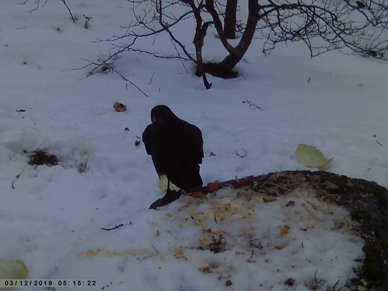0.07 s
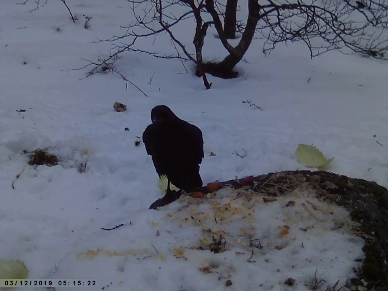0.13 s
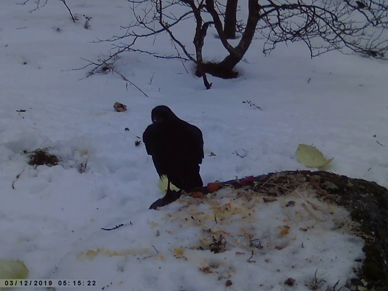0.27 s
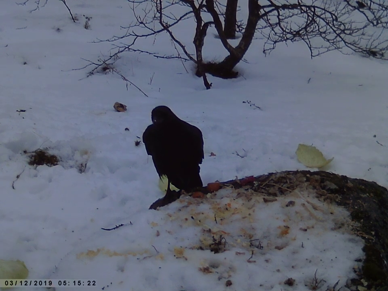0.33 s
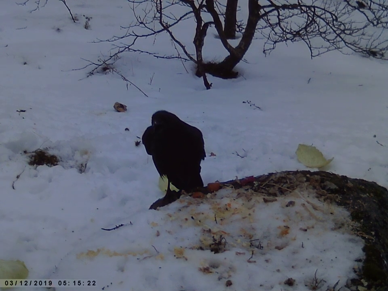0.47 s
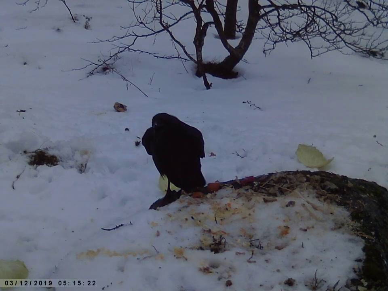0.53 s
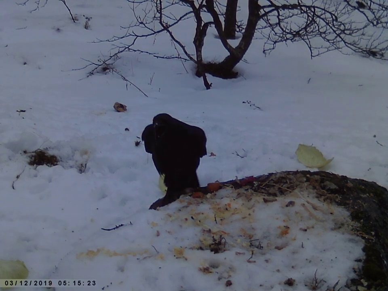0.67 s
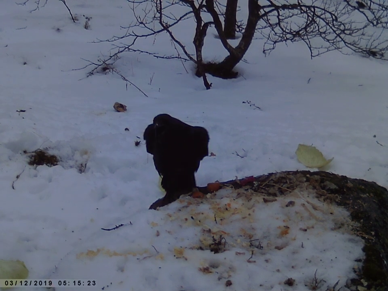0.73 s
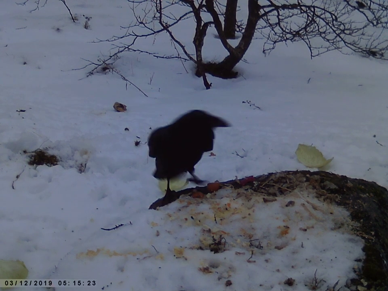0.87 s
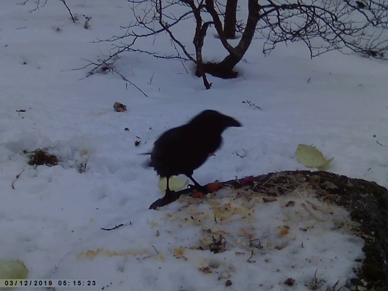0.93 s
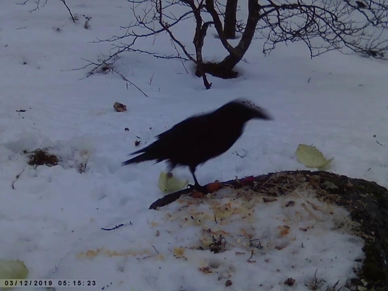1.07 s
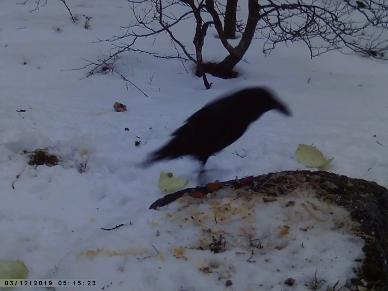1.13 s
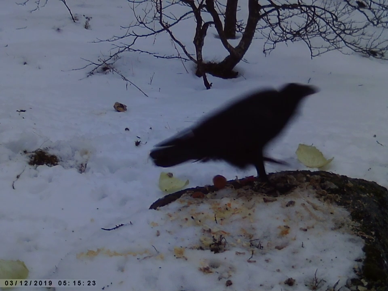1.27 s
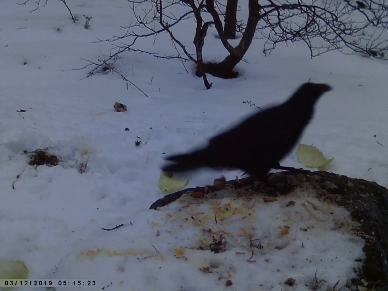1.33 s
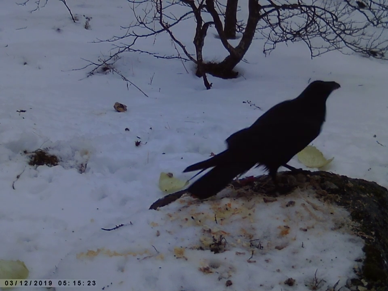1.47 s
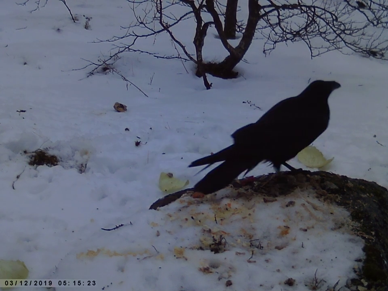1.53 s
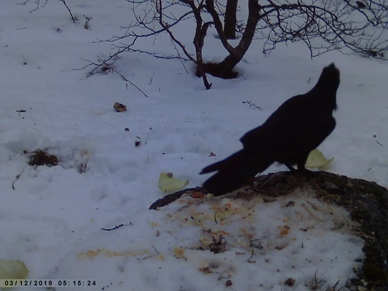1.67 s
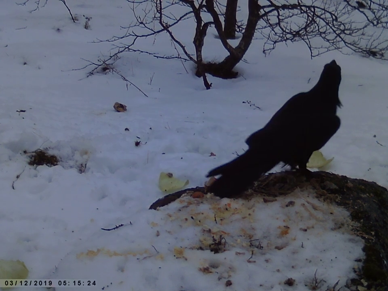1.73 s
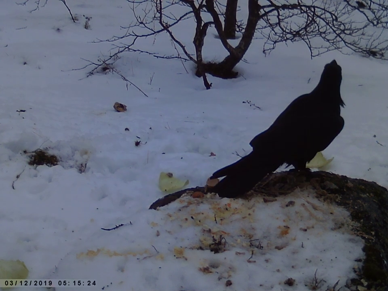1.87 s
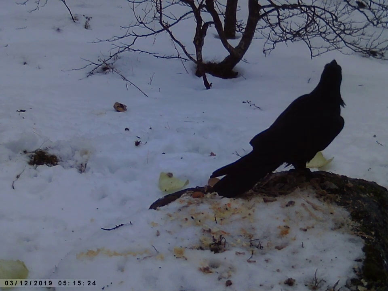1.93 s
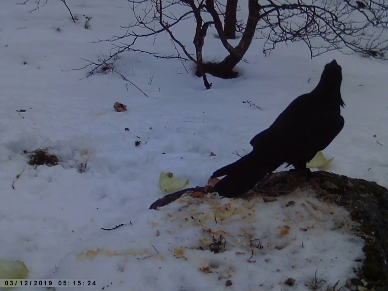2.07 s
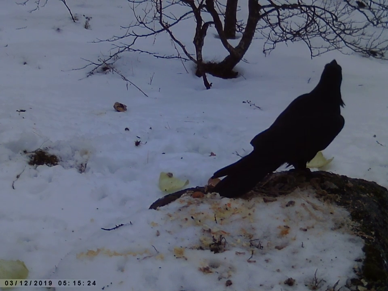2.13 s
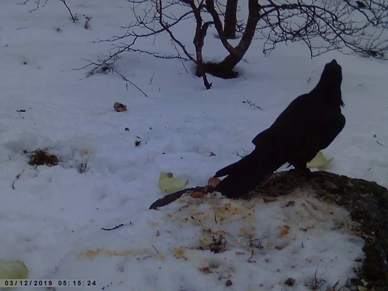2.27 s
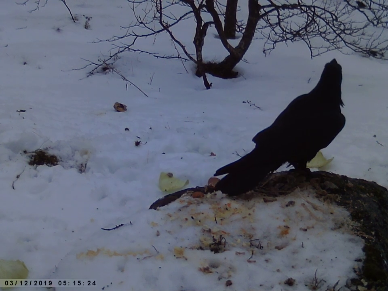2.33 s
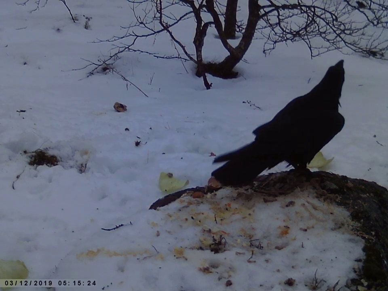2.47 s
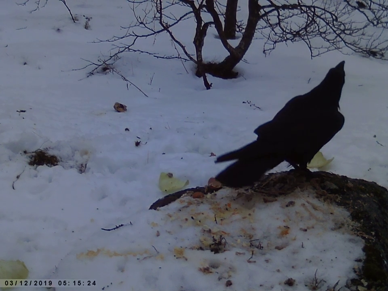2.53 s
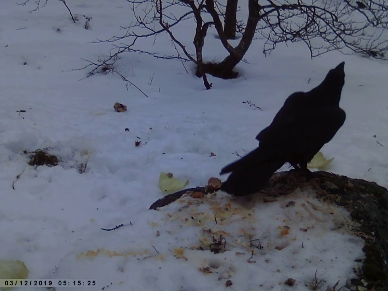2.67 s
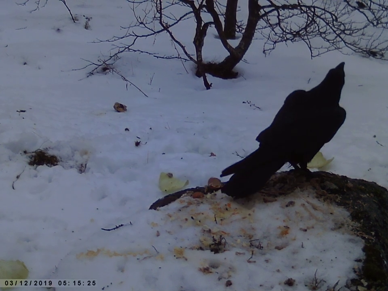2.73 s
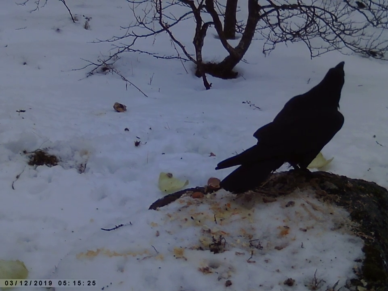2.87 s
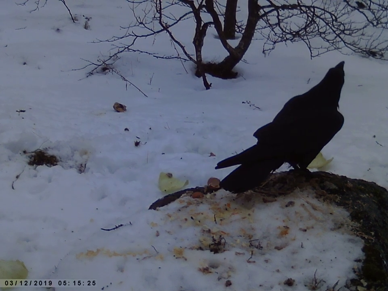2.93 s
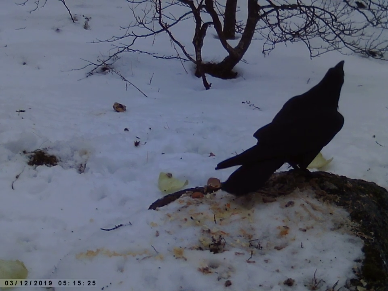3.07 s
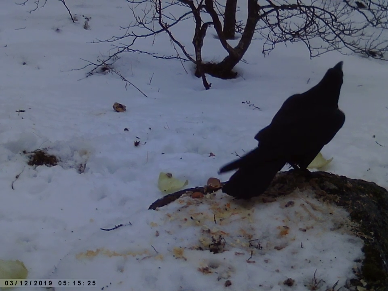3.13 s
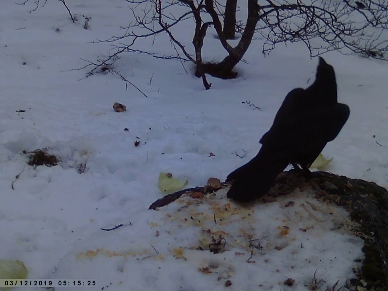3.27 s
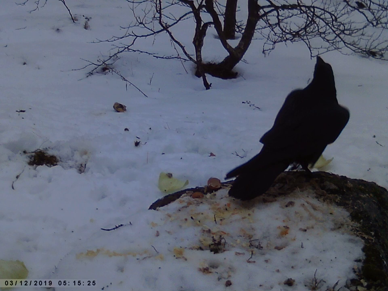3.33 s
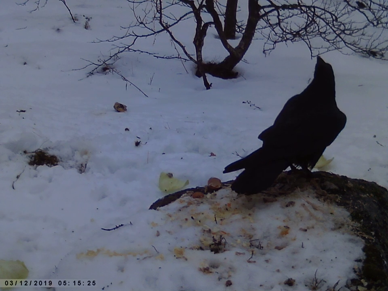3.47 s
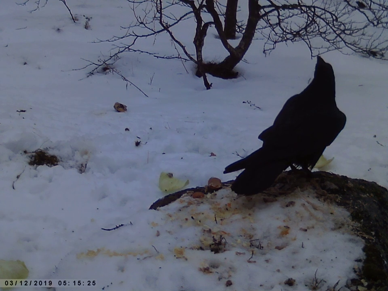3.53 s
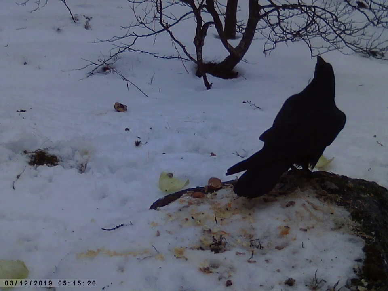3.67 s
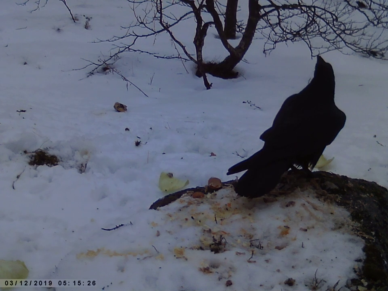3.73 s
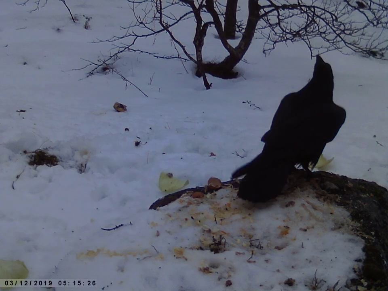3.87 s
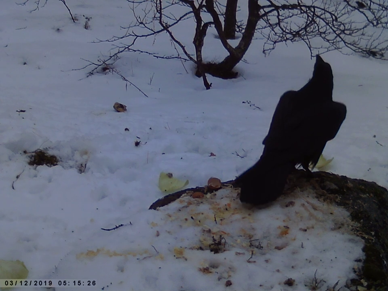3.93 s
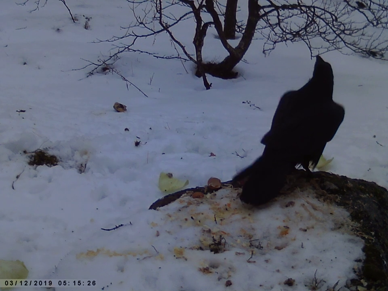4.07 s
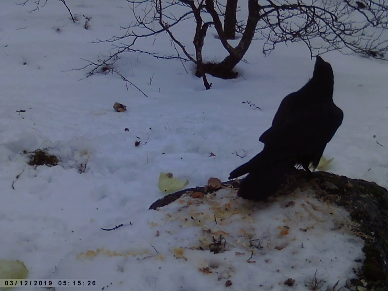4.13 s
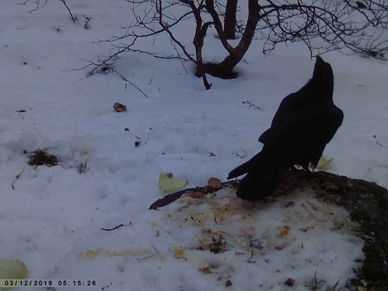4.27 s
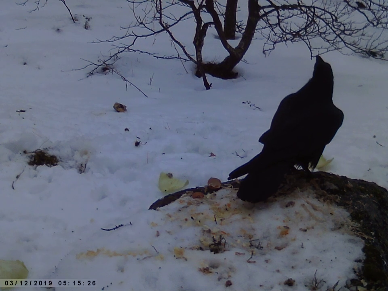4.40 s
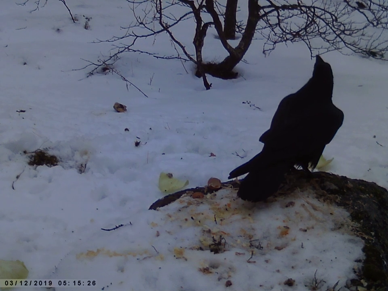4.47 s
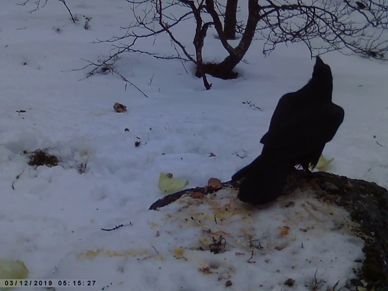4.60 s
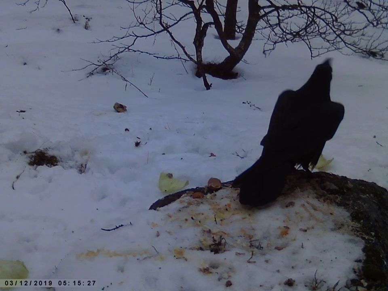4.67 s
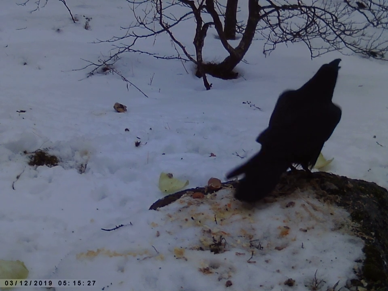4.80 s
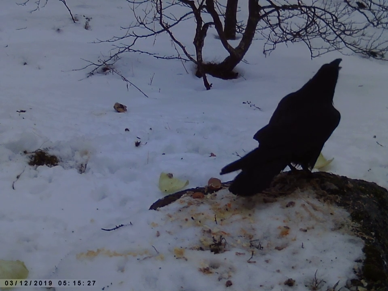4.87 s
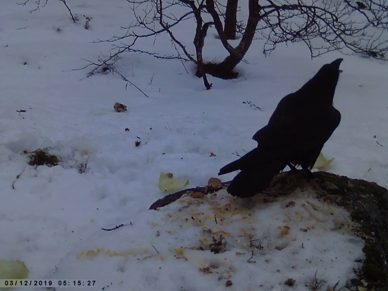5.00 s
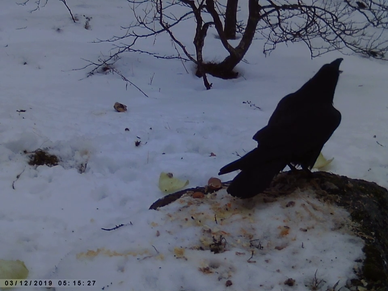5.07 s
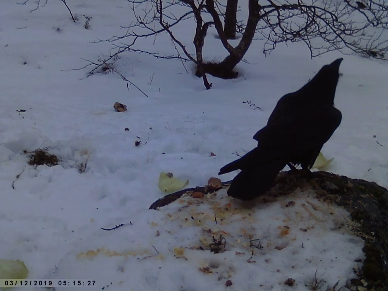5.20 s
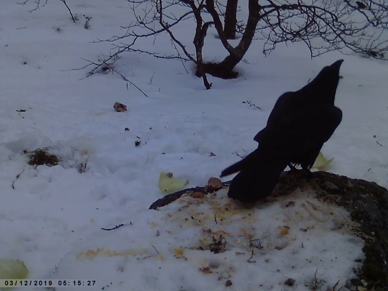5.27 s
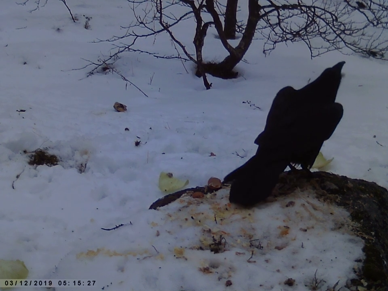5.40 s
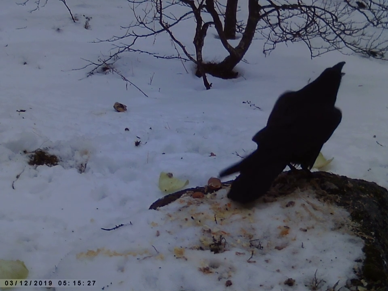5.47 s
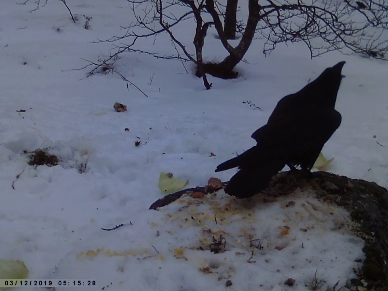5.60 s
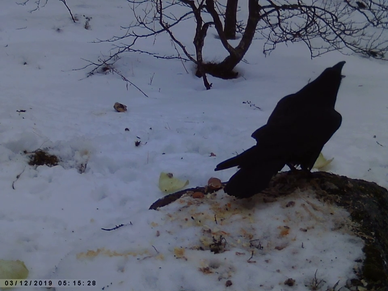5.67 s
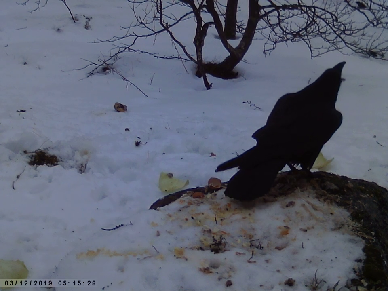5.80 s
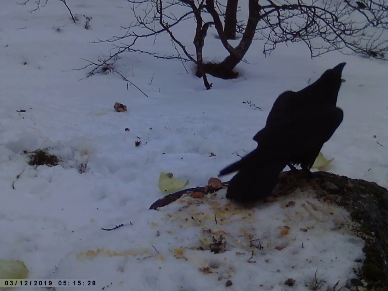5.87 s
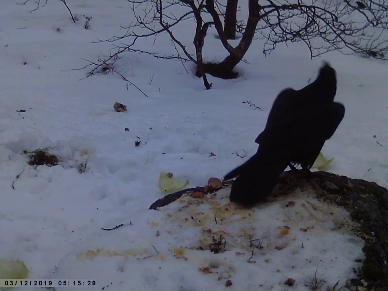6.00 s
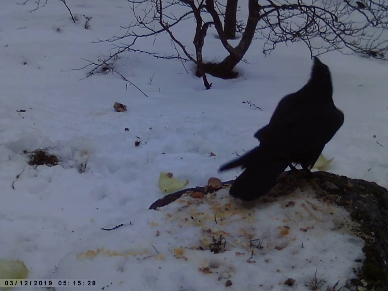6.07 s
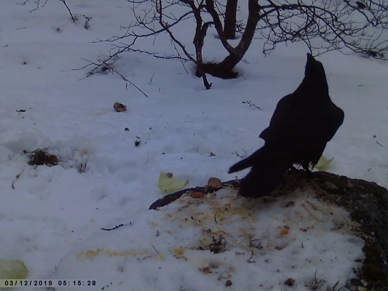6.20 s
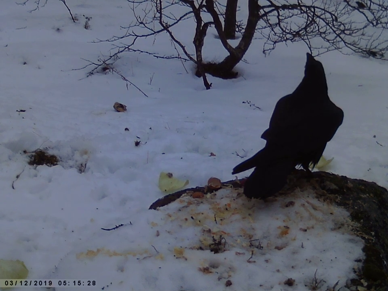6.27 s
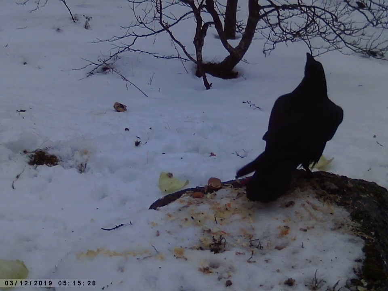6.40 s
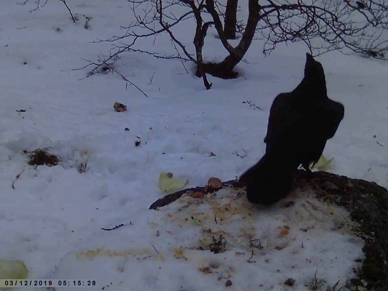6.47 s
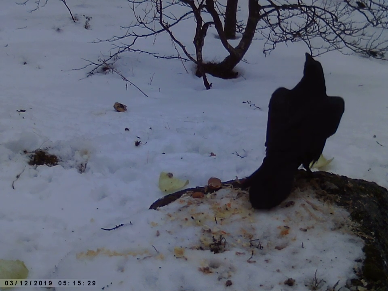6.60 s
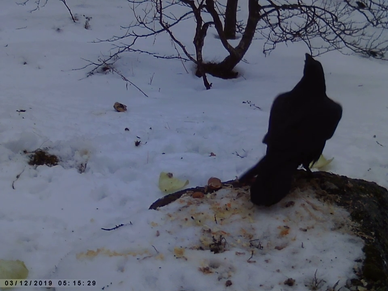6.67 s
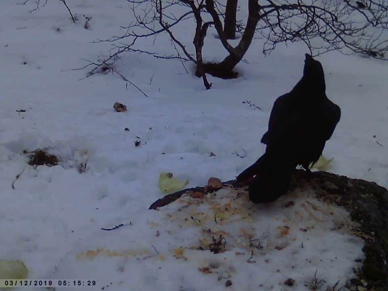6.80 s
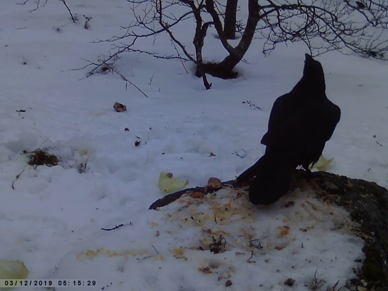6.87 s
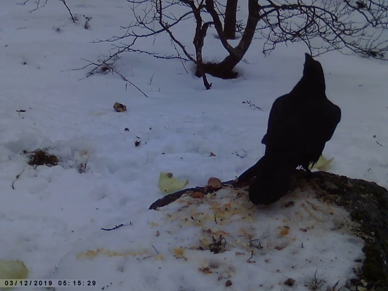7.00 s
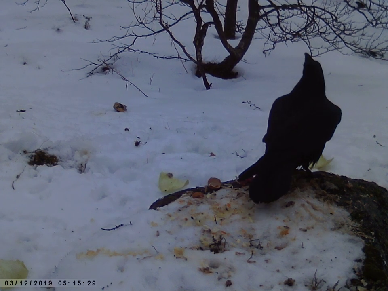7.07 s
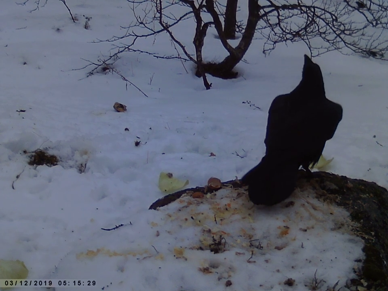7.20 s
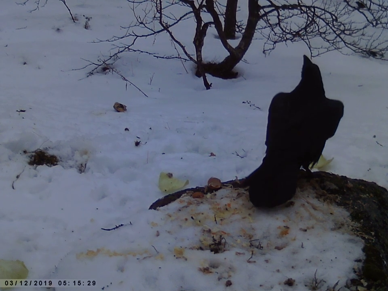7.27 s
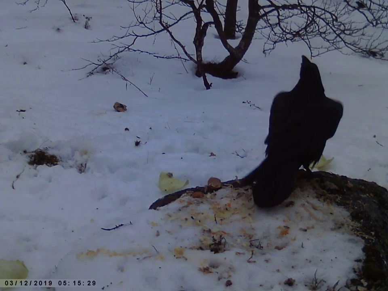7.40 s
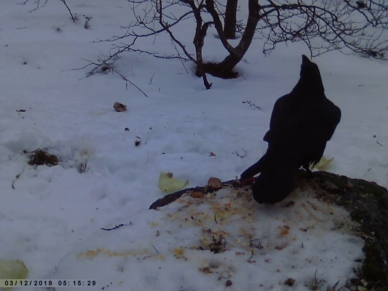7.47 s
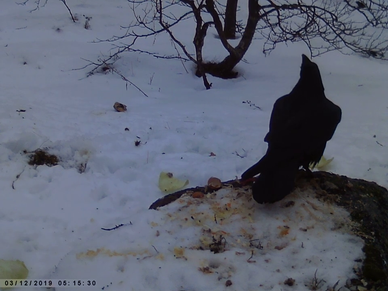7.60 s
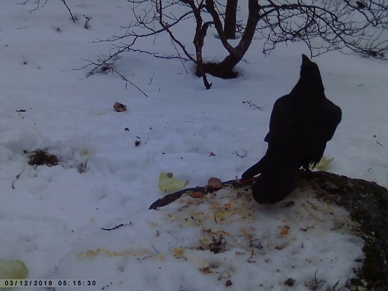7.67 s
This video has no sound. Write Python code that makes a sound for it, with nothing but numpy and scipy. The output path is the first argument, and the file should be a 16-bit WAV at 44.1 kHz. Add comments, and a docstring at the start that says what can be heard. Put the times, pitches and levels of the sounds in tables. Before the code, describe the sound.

Wind buffets a close outdoor microphone with low rumbling and blunt pops. A large black bird croaks once, harsh and forward, then scratches and crunches over crusted snow. The wind eases, and the bird turned away repeats a nasal, fluttering croak eight times, about every half to three quarters of a second. Each is a quarter second long, stuttering at first and dropping at the end, with a slight woodland reverberation. Gusts return later; thin hiss stays constant.

```python
"""Raven croaking in a windy winter forest

A raven on a snowy rock croaks once towards the microphone, hops up the rock, then croaks eight times facing away.
Each croak is a pulse train through throat resonances: it stutters, flutters in pitch about 43 times a second, then sags.
Noise bursts make the claws on crusted snow, and a swell of noise the folding wings; the forest answers faintly.
Gusts of shaped noise and cusps of pressure buffet the microphone, above a faint steady hiss."""
import sys
import numpy as np
from scipy import signal
from scipy.fft import rfft, irfft, next_fast_len
from scipy.io import wavfile
from scipy.ndimage import uniform_filter1d, map_coordinates

SR = 44100
rng = np.random.default_rng(int(sys.argv[2]) if len(sys.argv) > 2 else 0)


def inscribe(sig):
    """Save sig as 16-bit PCM at rate SR to the path in sys.argv[1].

    A 1-D sig is mono; a 2-D sig holds one channel per row.
    Samples are clipped to [-1, 1] before scaling.
    """
    pcm = np.round(np.clip(np.atleast_2d(sig).T, -1, 1) * 32767)
    wavfile.write(sys.argv[1], SR, pcm.astype(np.int16))


N = 340893

# Croaks: onset_s, length_factor, pitch_factor, relative_level_db, facing_microphone_0_to_1, throat_size_factor
# (the last multiplies frequency when the throat curves are read)
CROAKS = [(.622, 0.93, 1.043, -16, 0.91, 1.007), (2.610, 0.95, 1.024, -16.5, 0.06, 1.0),
          (3.160, 0.98, 1.024, -16.5, 0.03, 1.0), (3.885, 0.96, 1.032, -17, 0, 1.021),
          (4.606, 0.99, 1.034, -16.5, 0, 1.014), (5.258, 1.023, 1.002, -17, 0, 1.009),
          (5.837, 1.002, .985, -17.5, 0, 0.995), (6.444, 1.022, 1.02, -16.5, 0, 1.033),
          (7.197, 1.042, 1.007, -17.5, 0, 1.034)]
# Throat resonances with the beak open: frequency_hz, gain_db
THROAT_OPEN = [(230, -30), (570, -17), (760, -20.5), (990, -13.5), (1165, 2.5), (1290, -6), (1470, -4),
               (1780, -12.5), (2080, -24), (2500, -15.5), (2920, -17.5), (3200, -25), (3850, -18),
               (5100, -24.5), (6800, -46.5)]
# Throat resonances with the beak nearly shut: frequency_hz, gain_db
THROAT_SHUT = [(230, -16.5), (520, -18), (730, -20.5), (1040, -2), (1450, -6), (2000, -24.5), (2650, -5),
               (3150, -20.5), (3700, -14), (5100, -23), (6800, -44)]
# Fading of the voice towards the top: frequency_hz, gain_db
ROLL_OFF = [(6800, 0), (8300, -6.5), (10500, -15), (15000, -29)]
# Extra strength straight in front of the beak: frequency_hz, gain_db
FRONT = [(300, 3.5), (720, 12), (1150, -1.5), (1450, -1.5), (1900, 12.5), (2650, 0), (3400, 11), (4450, 17),
         (5600, 26), (7000, 24), (10500, 31.5)]
# Claws and crusted snow during the hop: start_s, peak_db, pitch_hz
STEPS = [(1.021, -42.5, 4710), (1.1192, -35.5, 5400), (1.1393, -41.5, 5030), (1.1973, -34, 4870),
         (1.2041, -38, 2623), (1.2684, -37.5, 4760), (1.277, -26, 4720), (1.2924, -34.5, 4900),
         (1.3888, -44, 4770), (1.6482, -45, 4900), (1.7737, -39.5, 5040)]
# Spectrum of the brushing feathers: frequency_hz, level_db
FEATHERS = [(1500, -25), (5000, 4), (9000, -16.5)]
# Decay time of the far trees: frequency_hz, t60_s
FOREST_T60 = [(300, 0.93), (1150, 0.94), (1900, 0.7), (5000, 0.74), (9000, 0.75)]
# Scattering by the trees: frequency_hz, gain_db
FOREST = [(300, -3.5), (800, 1), (1150, 0), (2000, 5), (3200, 2.5), (5200, 17.5), (7000, 17), (11000, 13)]
# Course of the wind at the microphone, before puffs and eddies: time_s, strength_db
WIND = [(0, -35), (.25, -26), (.55, -24), (.88, -24.5), (1.4, -39), (2.18, -44), (2.37, -63), (2.68, -40.5),
        (3.45, -47), (3.78, -53), (3.95, -42.5), (4.5, -53.5), (4.75, -45), (5.12, -49), (5.3, -33.5),
        (5.52, -43.5), (5.8, -32), (7.05, -28), (7.73, -22)]
# Short puffs that stand out from the wind: centre_s, length_s, rise_db
PUFFS = [(1.967, 0.017, 11), (2.202, 0.026, 10.5), (2.982, 0.067, 9), (3.609, 0.029, 12.5),
         (4.208, 0.036, 8.5), (4.408, 0.022, 14.5), (4.978, 0.038, 11.5), (6.272, 0.029, 5.5),
         (6.753, 0.017, 7.5)]
# Spectrum of light air: frequency_hz, level_db
RUMBLE = [(12, -34), (20, -1), (43, -1.5), (75, -0.5), (187, -21.5), (269, -39.5), (352, -42.5), (500, -49),
          (650, -81), (1100, -120)]
# Spectrum of strong gusts: frequency_hz, level_db
GUST = [(12, -32), (20, -4.5), (59, 1.5), (86, 0), (145, -3.5), (258, -14.5), (392, -22.5), (631, -37),
        (700, -35.5), (910, -65.5), (1540, -120)]
# Strongest eddies that slap the microphone: start_s, relative_peak_db
SLAPS = [(.217, -25), (.297, -27.5), (.473, -25.5), (.499, -23), (.529, -20), (.588, -22.5), (.88, -23),
         (.924, -28), (6.177, -29), (7.081, -28.5), (7.682, -23)]
# Spectrum of the steady hiss: frequency_hz, level_db
HISS = [(120, -36), (200, 3), (538, -8.5), (579, -6.5), (623, -7), (683, -9), (916, -8.5), (4860, -18.5),
        (13300, -19.5), (16000, -18.5)]

# Croak settings hold for length and pitch factors of 1; times count from the onset.
# The voice starts as a stutter of short bursts that open wide, then choke off and sag in pitch
STUTTER_S, STUTTERS = .0134, 3
CHOKE_DB, STUTTER_SAG, STUTTER_ROUGH = 24, .16, .55
# Then it flutters, a little slower with each beat: first and settled period, beats it takes to settle
FIRST_FLUTTER_S, LAST_FLUTTER_S, SETTLE_BEATS = .021, .025, 2.2
# The stutter turns into flutter, and the flutter dies out: middle and length of each change
SETTLE_AT_S, SETTLE_S, STILL_AT_S, STILL_S = .031, .014, .206, .018
# A flutter swings below and above the pitch (shares of it) and swells at the crest
FLUTTER_DIP, FLUTTER_RISE, FLUTTER_SWELL_DB = .225, .06, 3
# The crest comes at this share of a flutter; a power under 1 leaves the low pitch quickly and lingers up there
CREST_SHARE, CLIMB_POWER = .79, .85
# The pitch holds, then sags as the air runs out, down to a floor; scoop and bend act on top of this
PITCH_HZ, HOLD_S, SAG_HZ_PER_S, SAG_FLOOR_HZ = 549.2, .205, 8400, 185
SCOOP, SCOOP_S = .11, .012  # the pitch is this share low at the onset and scoops up
# Effort: a soft lead-in, a quick attack, a slight swell, then the release
LEAD_S, LEAD_DB, LEAD_RISE_DB_PER_S = .0088, -8, 1800
ATTACK_DB, ATTACK_S, SWELL_DB_PER_S = -3.5, .028, 3.5
RELEASE_AT_S, RELEASE_S, RELEASE_DB = .22, .027, 21.5
# Roughness (0-1) clears as the croak goes on
ROUGH_START, ROUGH_END, CLEARING_S = .6, .22, .023
# The beak opens after the onset and closes again with the sag, to a last opening (0-1)
OPEN_AT_S, OPEN_S, CLOSE_AT_S, CLOSE_S, END_OPENING = .036, .04, .22, .019, .12

FOLD_AT_S, FOLD_S, FOLD_DB = 1.44, .09, -69.5  # the wings fold after the hop
EDDIES_PER_S, EDDY_DB = 14, 2  # the wind swings at random around its course
# Weaker slaps come at random and grow faster than the wind
SMALL_SLAPS_PER_S, SMALL_SLAP_DB, SLAP_GROWTH = 24, -7.5, 1.8
HISS_DB = -62.5
TOP_HZ = 15900  # band limit


def raven(voice_db=35, turned_db=-3):
    """Source-filter principle: membrane pulses excite the throat, and the beak directs the sound."""
    direct, spread = np.zeros(N), np.zeros(N)
    for s, length, pitch, db, facing, throat in CROAKS:
        t = np.arange(-2 * STUTTER_S * SR, SR // 3) / SR
        flow = amp(db + voice_db) * flicker(syrinx(t / length, pitch))
        wide, shut = (
            ring(flow, lambda hz: along(shape, hz * throat) + along(ROLL_OFF, hz))
            for shape in (THROAT_OPEN, THROAT_SHUT))
        # the resonances shift as the beak opens and shuts
        opening = beak(t / length)
        voice = opening * wide + (1 - opening) * shut
        aimed = ring(voice, lambda hz: facing * along(FRONT, hz))
        add(direct, s + t[0], aimed + glints(aimed))
        # a bird turned to the microphone sends less into the trees
        add(spread, s + t[0], amp(turned_db * facing) * voice)
    return direct, spread


def syrinx(t, pitch, drift=.014, jitter_s=.00007, shimmer_db=4, rasp=.02, soft_hz=1250):
    """Self-oscillation: one pulse per closing of the membranes, with a rasp of air at each opening."""
    hz, force, rough = gesture(t)
    turns = np.cumsum(pitch * hz * (1 + drift * wobble(130, len(t)))) / SR
    at = np.interp(np.arange(1, turns[-1]), turns, np.arange(len(t)))
    k = at.astype(int)
    late, strong = rng.standard_normal((len(k), 2)).T
    # roughness scatters the pulses in time (jitter) and strength (shimmer)
    jittered = at + late * rough[k] * jitter_s * SR
    sizes = force[k] * amp(shimmer_db * rough[k] * strong)
    train = pulses(jittered, sizes, len(t))
    air = unit(np.exp(-3 * (turns % 1)) * rng.standard_normal(len(t)))
    # before the onset the membranes swing without touching: a soft, dull lead-in
    low_pass = signal.butter(3, soft_hz, fs=SR, output="sos")
    soft = signal.sosfilt(low_pass, train * (t < 0))
    return soft + train * (t >= 0) + rasp * rough * force * air


def gesture(t):
    """Frequency and amplitude modulation: pitch, force and roughness through stutter, flutter and sag."""
    cycle, settled = beat(t), ramp(t, SETTLE_AT_S, SETTLE_S)
    stutter = 1 - settled
    flutter = settled * (1 - ramp(t, STILL_AT_S, STILL_S))
    climb = np.minimum(cycle / CREST_SHARE, (1 - cycle) / (1 - CREST_SHARE))
    arch = np.sin(np.pi / 2 * climb) ** CLIMB_POWER
    swing = (FLUTTER_DIP + FLUTTER_RISE) * arch - FLUTTER_DIP
    bend = flutter * swing - stutter * STUTTER_SAG * cycle
    scoop = 1 - SCOOP * np.exp(-np.maximum(t, -STUTTER_S) / SCOOP_S)
    sagging = np.maximum(PITCH_HZ - SAG_HZ_PER_S * np.maximum(t - HOLD_S, 0), SAG_FLOOR_HZ)
    hz = sagging * scoop * (1 + bend)
    swell = flutter * FLUTTER_SWELL_DB * (arch ** 2 - .5)
    choke = stutter * (t > -STUTTER_S / 2) * CHOKE_DB * cycle ** 2
    db = effort(t) + swell - choke
    fading = np.exp(-np.maximum(t - SETTLE_AT_S, 0) / CLEARING_S)
    clearing = ROUGH_END + (ROUGH_START - ROUGH_END) * fading
    return hz, amp(db), stutter * STUTTER_ROUGH + settled * clearing


def beat(t, count=12):
    """Phase of a slowing modulation: position 0-1 within the current stutter or flutter."""
    settling = np.exp(-np.arange(count) / SETTLE_BEATS)
    periods = LAST_FLUTTER_S + (FIRST_FLUTTER_S - LAST_FLUTTER_S) * settling
    stutters = STUTTER_S * np.arange(-2, STUTTERS + 1)
    starts = np.concatenate([stutters, stutters[-1] + np.cumsum(periods)])
    return np.interp(t, starts, np.arange(len(starts))) % 1


def effort(t):
    """Amplitude envelope of one croak in dB: lead-in, attack, swell, release."""
    lead = LEAD_DB + LEAD_RISE_DB_PER_S * np.minimum(t + LEAD_S, 0)
    held = ATTACK_DB * np.maximum(1 - t / ATTACK_S, 0) + SWELL_DB_PER_S * t
    release = RELEASE_DB * (np.maximum(t - RELEASE_AT_S, 0) / RELEASE_S) ** 2
    return np.where(t < 0, lead, held) - release


def beak(t):
    """Variable aperture: the opening of the beak, 0-1, which sets the mix of throat resonances."""
    closing = (1 - END_OPENING) * ramp(t, CLOSE_AT_S, CLOSE_S)
    return np.clip(ramp(t, OPEN_AT_S, OPEN_S) - closing, 0, 1)


def flicker(x, from_hz=2000, full_hz=4000, depth_db=2.8, size=128):
    """Random spectral modulation: the upper partials flicker in patches, so no two flutters are alike."""
    hz, _, z = signal.stft(x, SR, nperseg=size)
    grain = uniform_filter1d(rng.standard_normal(z.shape), size=2, axis=0)  # across frequency
    patches = unit(uniform_filter1d(grain, size=4, axis=1))  # across time
    depth = along([(from_hz, 0), (full_hz, depth_db)], hz)[:, None]
    return signal.istft(z * amp(depth * patches), SR, nperseg=size)[1][:len(x)]


def glints(x, first_s=.001, last_s=.012, echo_db=-5, treble_hz=3000, count=16):
    """Early reflection: treble glances off rock, crust and branches; the paths change as the head moves."""
    high_pass = signal.butter(3, treble_hz, "high", fs=SR, output="sos")
    treble = signal.sosfilt(high_pass, x)
    out, progress = np.zeros(len(x)), np.linspace(0, 1, len(x))
    # five sets of paths, crossfaded at equal power
    for moment in np.linspace(0, 1, 5):
        delay, strength = rng.random((count, 2)).T
        sizes = (strength - .5) / np.linalg.norm(strength - .5)
        paths = pulses((first_s + (last_s - first_s) * delay ** 2) * SR, sizes, SR // 40)
        fade = np.sqrt(np.maximum(1 - 4 * np.abs(progress - moment), 0))
        out += fade * signal.fftconvolve(treble, paths)[:len(x)]
    return amp(echo_db) * out


def steps(t60=.0081, scrape_t60=.058, scrape_db=-17, octave_db=-20):
    """Impact and friction: each footfall is a sharp crunch, then a short scrape of icy grains."""
    out, t = np.zeros(N), np.arange(SR // 8) / SR
    for s, db, hz in STEPS:
        decay = amp(-60 * t / t60) + amp(scrape_db - 60 * t / scrape_t60)
        grains = rng.standard_normal(len(t)) ** 3 * decay  # the cube makes the noise sparse
        crunch = ring(grains, lambda f: octave_db * np.abs(np.log2((f + 1) / hz)))
        add(out, s, amp(db) * crunch / np.abs(crunch).max())
    return out


def wings(ruffle_db=3):
    """Friction noise: feathers brush in a faint, uneven swish as the wings fold."""
    swell = np.exp(-.5 * ((np.arange(N) / SR - FOLD_AT_S) / FOLD_S) ** 2)
    return swell * amp(FOLD_DB + ruffle_db * wobble(60)) * noise(FEATHERS)


def forest(x, near_db=-23, near_t60=.38, far_db=-31):
    """Diffuse scattering: nearby trunks answer quickly; the far trees keep a faint long tail."""
    hz, t, z = signal.stft(rng.standard_normal((2, SR)), SR, nperseg=256)
    near = signal.istft(z[0] * amp(-60 * t / near_t60), SR, nperseg=256)[1]
    far_decay = amp(-60 * t / along(FOREST_T60, hz)[:, None])
    far = signal.istft(z[1] * far_decay, SR, nperseg=256)[1]
    tail = amp(near_db) * near / np.linalg.norm(near) + amp(far_db) * far / np.linalg.norm(far)
    return filtered(signal.fftconvolve(x, tail)[:N], lambda f: amp(along(FOREST, f)))


def wind(gust_from_db=-31, gust_span_db=4, light_lumps_db=3, gust_lumps_db=3.5):
    """Turbulence: eddies press on the microphone, and stronger gusts are brighter and lumpier."""
    t = np.arange(N) / SR
    puffs = sum(rise * np.exp(-((t - s) / length) ** 2) for s, length, rise in PUFFS)
    db = curves(WIND, t)[0] + puffs + EDDY_DB * wobble(EDDIES_PER_S)
    strong = 1 / (1 + np.exp((gust_from_db - db) / gust_span_db))
    light = unit(noise(RUMBLE) * amp(light_lumps_db * wobble(25)))
    gust = unit(noise(GUST) * amp(gust_lumps_db * wobble(70)))
    return amp(db) * (np.sqrt(1 - strong ** 2) * light + strong * gust)


def slaps(width_s=.0011, tip_s=.00032, slap_db=12):
    """Pressure transient: a passing eddy gives one rounded cusp, up or down."""
    out, t = np.zeros(N), np.arange(SR // 25) / SR
    lead = t[-1] / 2
    cusp = np.exp((tip_s - np.hypot(t - lead, tip_s)) / width_s)
    times = rng.random(int(SMALL_SLAPS_PER_S * N / SR)) * N / SR
    strength, = curves(WIND, times)
    small = strength.max() + SLAP_GROWTH * (strength - strength.max()) + SMALL_SLAP_DB
    for s, db in [*SLAPS, *zip(times, small)]:
        # the tip falls one width after the start
        add(out, max(s + width_s - lead, 0), rng.choice([-1, 1]) * amp(db + slap_db) * cusp)
    return out


def noise(spectrum):
    """Spectral shaping: coloured noise of rms 1."""
    return unit(filtered(rng.standard_normal(N), lambda hz: amp(along(spectrum, hz))))


def ring(x, colour, size=4096):
    """Minimum-phase resonance: pass x through a causal body whose response in dB is colour(hz)."""
    cepstrum = irfft(np.log(amp(colour(np.fft.rfftfreq(size, 1 / SR))) + 1e-6))
    # folding the cepstrum onto positive times makes the response causal
    cepstrum[1:size // 2] *= 2
    cepstrum[size // 2 + 1:] = 0
    return signal.fftconvolve(x, irfft(np.exp(rfft(cepstrum))))[:len(x)]


def filtered(x, gain):
    """Linear filtering: multiply the spectrum by gain(hz)."""
    m = next_fast_len(len(x) + 8192)
    return irfft(rfft(x, m) * gain(np.fft.rfftfreq(m, 1 / SR)), m)[:len(x)]


def pulses(at, sizes, size, order=8):
    """Sampling theorem: band-limited clicks at fractional sample positions."""
    taps = at.astype(int)[:, None] + np.arange(1 - order, order + 1)
    d = taps - at[:, None]
    shape = np.sinc(d) * np.cos(np.pi * d / (2 * order)) ** 2
    return np.bincount(np.clip(taps, 0, size - 1).ravel(), (shape * sizes[:, None]).ravel(), size)


def wobble(rate, size=N):
    """Random modulation: a smooth curve through rate random knots a second."""
    knots = rng.standard_normal(int(size * rate / SR) + 4)
    return map_coordinates(knots, [np.arange(size) * rate / SR])


def ramp(t, middle, length):
    """Raised-sine transition: a smooth step from 0 to 1."""
    return .5 + .5 * np.sin(np.pi * np.clip((t - middle) / length, -.5, .5))


def along(points, hz):
    """Logarithmic frequency scale: read (hz, value) points at hz."""
    f, v = np.transpose(points)
    return np.interp(np.log(hz + 1), np.log(f + 1), v)


def curves(rows, t):
    """Linear interpolation: read each column of a table at the times t."""
    s, *cols = np.transpose(rows)
    return [np.interp(t, s, c) for c in cols]


def amp(db):
    """Decibel scale: level to amplitude gain."""
    return 10 ** (np.asarray(db) / 20)


def unit(x):
    """Normalization: scale to rms 1."""
    return x / np.sqrt(np.mean(x ** 2) + 1e-20)


def add(track, s, x):
    """Superposition: mix x into the track at time s."""
    part = track[round(s * SR):][:len(x)]
    part += x[:len(part)]


def scene(feet_spread_db=-5):
    """Superposition of bird, forest, wind and a faint steady hiss."""
    direct, spread = raven()
    feet = steps() + wings()
    echoes = forest(spread + amp(feet_spread_db) * feet)
    hiss = amp(HISS_DB) * noise(HISS)
    return (direct + feet + echoes + wind() + slaps() + hiss)[None]


def record(dry, ceiling=.85, trough=.6, hardness=6):
    """Saturation and band limiting: the microphone flattens high peaks unevenly, then the top is cut."""
    limit = np.where(dry[0] > 0, ceiling, trough)
    clipped = dry[0] / (1 + np.abs(dry[0] / limit) ** hardness) ** (1 / hardness)
    return filtered(clipped, lambda hz: hz < TOP_HZ)[None]


dry = scene()
out = record(dry)
inscribe(out)
```